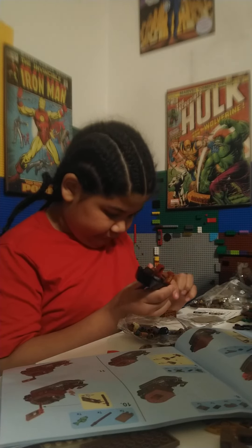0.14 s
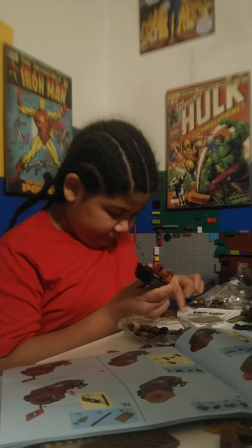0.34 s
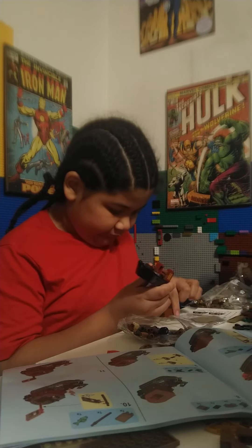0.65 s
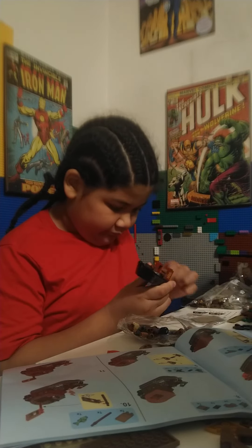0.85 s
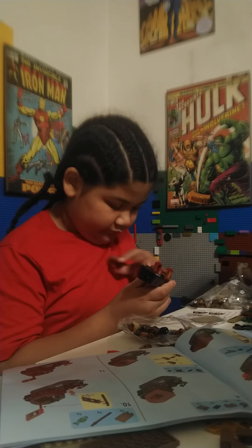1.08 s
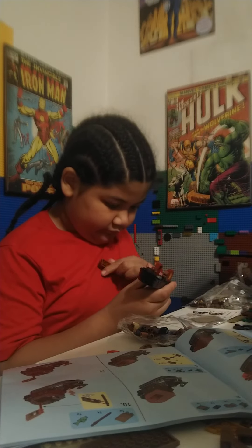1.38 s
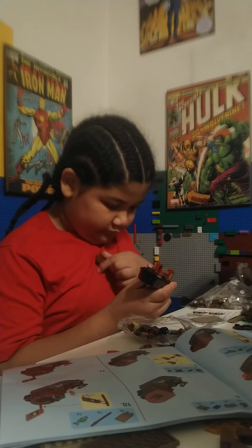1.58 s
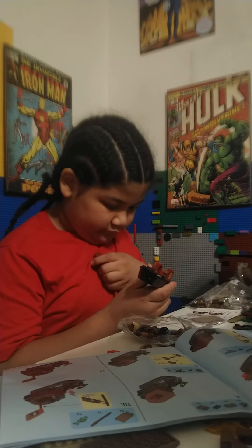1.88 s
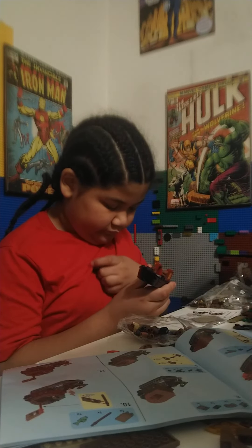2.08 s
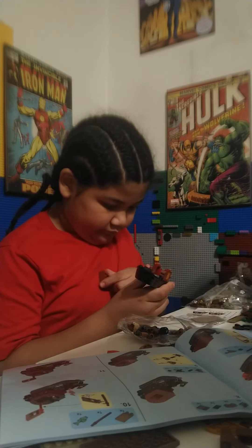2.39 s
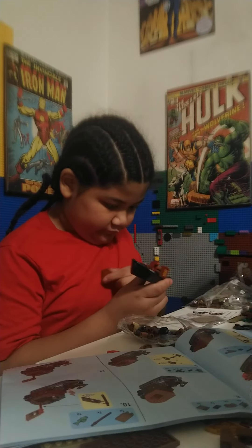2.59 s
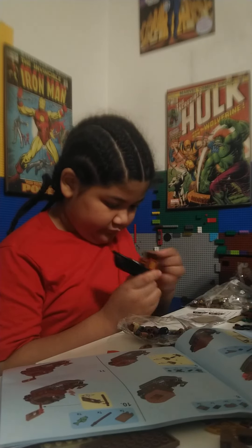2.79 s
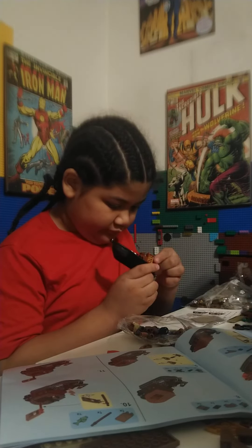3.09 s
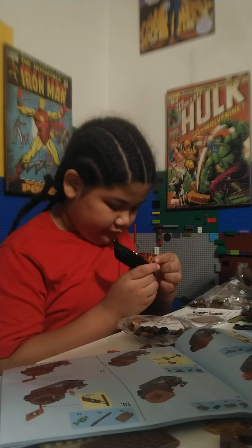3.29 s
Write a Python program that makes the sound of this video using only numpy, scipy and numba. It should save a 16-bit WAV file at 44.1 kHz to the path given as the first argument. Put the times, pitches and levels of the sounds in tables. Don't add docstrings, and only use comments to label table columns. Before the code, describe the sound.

Small plastic bricks clack and rattle on a table in a quick burst, click again more softly half a second later, then only muffled bumps and faint ticks in a small bedroom, close phone microphone.

```python
import sys
import numpy as np
from scipy import signal
from scipy.io import wavfile
from scipy.ndimage import uniform_filter1d
from numba import njit

SR = 44100
rng = np.random.default_rng(int(sys.argv[2]) if len(sys.argv) > 2 else 0)


def boost_factor(decibels):
    exponent = np.asarray(decibels, float) / 20
    return 10 ** exponent


def wav_record(signal):
    frames = np.transpose(np.atleast_2d(signal))
    bounded = np.clip(frames, -1, 1)
    quanta = np.round(bounded * 32767).astype(np.int16)
    wavfile.write(sys.argv[1], SR, quanta)


N = 152145


def level(x, db):
    return x * boost_factor(db) / np.sqrt(np.mean(x ** 2))


def peak(x):
    return x / np.abs(x).max()


@njit
def svf(x, hz, width):
    y, band, low = np.empty(len(x)), 0., 0.
    g, damping = np.tan(np.pi * hz / SR), width / hz
    for i in range(len(x)):
        v = (band + g * (x[i] - low)) / (1 + g * (g + damping))
        band, low = 2 * v - band, low + 2 * g * v
        y[i] = damping * v
    return y


def walk(rate):
    hold = int(SR / rate)
    steps = np.repeat(rng.standard_normal(N // hold + 1), hold)
    return 1.45 * uniform_filter1d(uniform_filter1d(steps, hold), hold)[:N]


def add(out, s, x):
    i = max(int(s * SR), 0)
    out[i:i + len(x)] += x[:N - i]


def rattle(t60, crack_db):
    size, hits_per_s, rattle_db, scatter_db = 8192, 3500, -15.5, 3.5
    chance, side, strength = rng.random((3, size))
    happens = chance < hits_per_s / SR
    hits = happens * np.sign(side - .5) * boost_factor(-scatter_db * np.log(strength + 1e-9))
    x = boost_factor(rattle_db) * hits * boost_factor(-60 * np.arange(size) / SR / max(t60, .005))
    x[0] += boost_factor(crack_db)
    return x


def ring(x, modes, widen):
    out = 0
    for k, (hz, width, db) in enumerate(modes):
        pitch_off, level_off = 1 + .01 * rng.standard_normal(2)
        gain = (-1) ** k * boost_factor(db + 55 * (level_off - 1)) / np.sqrt(width * widen)
        out = out + gain * svf(x, hz * pitch_off, width * widen)
    return out


def snap_cycle(cut_hz):
    turn = np.arange(128) / SR * 0.36 * cut_hz
    return peak(np.sin(2 * np.pi * turn) * np.exp(-(2 * (turn - 1)) ** 2))


def knocks():
    # t/s, peak level/dB, treble share/dB, rattle t60/s, contact cut-off f/Hz
    knock_list = [(.0, -43, -22.5, 0.069, 2045), (0.017, -22.5, -22, 0.066, 3910),
                  (.024, -34.5, -30.5, 0.24, 3450), (.074, -28, -31.5, 0.17, 2890),
                  (.088, -26.5, -21, 0.04, 3900), (0.104, -33, -21, 0.082, 2900),
                  (.145, -33, -30.5, 0.051, 2600), (.153, -36.5, -21.5, 0.11, 3700),
                  (0.443, -53.5, -46, 0.095, 2010), (.505, -59, -29.5, 0.24, 1780),
                  (.539, -49.5, -34, 0.29, 934), (0.5613, -36.5, -10, 0.11, 4700),
                  (0.574, -46.5, -15.5, 0.036, 3940), (0.589, -44.5, -6.5, 0.06, 2500),
                  (.598, -45, -14, 0.15, 2500), (0.61, -46.5, -24.5, 0.062, 3020)]
    # f/Hz, width/Hz, level/dB
    body_modes = [(512, 22, 0), (643, 54, -1.5), (1092, 32, 6.5), (1420, 65, 5.5), (1830, 61, -12),
                  (2050, 24, 1), (2620, 59, -5), (3120, 120, 2), (3460, 180, -5)]
    # f/Hz, width/Hz, level/dB
    stud_modes = [(3730, 960, -1), (4460, 770, -4), (5850, 720, 0.5), (7150, 340, 2)]
    knock_db, treble_gain_db, broad_db, table_db, snap_db = -4, 7, 8.5, -8.5, 3.5
    boom_lag_s = .005
    out = np.zeros(N)
    for s, db, treble_db, t60, cut_hz in knock_list:
        force = rattle(t60, crack_db=-6)
        studs = peak(ring(force, stud_modes, widen=0.96))
        soft = signal.butter(3, 0.94 * cut_hz, fs=SR)
        dull = peak(signal.lfilter(*soft, force))
        body = peak(ring(dull, body_modes, widen=2.1))
        body = body + boost_factor(broad_db) * svf(dull, 2000.0, 1700.0)
        boom = svf(dull, 125., 60.0) + 3 * svf(dull, 230., 37.0) + .6 * svf(dull, 354.0, 61.0)
        add(out, s, boost_factor(db + knock_db) * (body + boost_factor(treble_db + treble_gain_db) * studs))
        dulling_db = 0.54 * max(treble_db + 24.5, 0)
        add(out, s, boost_factor(db + snap_db - dulling_db) * snap_cycle(cut_hz))
        add(out, s + boom_lag_s, boost_factor(db + knock_db) * boost_factor(table_db) * 10 * boom)
    return out


def pings():
    # t/s at the crest, level/dB, f/Hz
    rebounds = [(.0182, -38, 1975), (.0264, -42, 2790), (0.0335, -39.5, 2860), (0.0344, -47, 1290),
                (.033, -47.5, 3590), (0.049, -41, 1500), (0.048, -43, 2790), (0.055, -45.5, 2670),
                (0.0193, -52.5, 6800), (.076, -61.5, 4950), (.0748, -43.5, 1808), (.078, -43, 2300),
                (.089, -32, 1176), (.089, -52, 7000), (.1, -56.5, 7020), (0.114, -56.5, 7150),
                (.123, -59.5, 7150), (.096, -39, 1216), (.1013, -50, 2670), (.1053, -51.5, 2680),
                (.1147, -46.5, 2710), (0.1461, -46.5, 1205), (0.154, -37.5, 1200), (0.1571, -48, 2650),
                (0.1795, -56, 2550), (.442, -64, 1700), (0.5058, -59.5, 1180), (0.5569, -56, 1130),
                (0.5634, -39.5, 1114), (.564, -43, 7150), (0.5646, -50, 2990), (.572, -46, 2080),
                (.5724, -51, 3250), (0.5733, -49, 7150), (0.5786, -48, 3000), (0.5807, -50.5, 1145),
                (0.588, -56.5, 7150), (0.5927, -50, 1162), (.6, -54, 717), (0.5935, -57, 7150),
                (0.6006, -45.5, 1100), (.6009, -49.5, 2600), (0.6106, -54, 2590)]
    # t/s at the crest, level/dB, f/Hz
    faint_rebounds = [(1.9261, -72, 2282), (1.9349, -71, 2350), (1.9388, -72, 3200), (1.9445, -59, 2255),
                      (1.9473, -71, 5060), (1.9496, -77, 7470), (1.952, -63, 2253), (1.9623, -68.5, 2290),
                      (2.075, -76, 3340), (2.0895, -76, 2756), (2.3711, -82, 5060), (3.118, -76, 6030),
                      (3.124, -70, 3030), (2.015, -78, 2230), (3.1189, -65.5, 1024), (3.1198, -67.5, 3100),
                      (3.1301, -75, 1507), (3.1307, -71.5, 2885), (3.1478, -81, 5100), (3.1486, -76, 3830),
                      (3.1513, -69, 1624), (3.1567, -70, 2320)]
    out, t = np.zeros(N), np.arange(1024) / SR
    for rows, rise_s in ((rebounds, .0014), (faint_rebounds, .002)):
        for s, db, hz in rows:
            tone = np.sin(2 * np.pi * (hz * t + rng.random()))
            swell = t / rise_s * np.exp(1 - t / rise_s)
            add(out, s - 1.5 * rise_s, boost_factor(db + 1) * swell * tone)
    return out


def ticks():
    # t/s, peak level/dB, f/Hz, width/Hz, rattle t60/s
    tick_list = [(0.599, -63, 5850, 250, 0.069), (0.619, -70.5, 7150, 201, 0.36),
                 (0.636, -62, 2660, 90.6, 0.035), (.68, -60.5, 1420, 201, 0.23),
                 (1.09, -69.5, 1140, 149, 0.084), (1.48, -77.5, 7130, 200, 0.49),
                 (1.9244, -64.5, 2250, 1510, .25), (1.927, -65.5, 5030, 2490, 0.23),
                 (1.93, -65.5, 7250, 500, 0.1), (2.0607, -63, 5060, 3500, 0.01),
                 (2.37, -69.5, 4800, 2500, 0.03), (3.115, -62.5, 1200, 900, 0.2),
                 (3.115, -64, 6400, 1990, .12), (3.122, -68, 3100, 1500, 0.1),
                 (3.146, -71, 5900, 2500, 0.08), (3.148, -64.5, 2010, 1200, 0.25),
                 (3.152, -70, 3700, 1490, .08)]
    out = np.zeros(N)
    for s, db, hz, width, t60 in tick_list:
        force = rattle(t60, crack_db=-12)
        note = svf(svf(force, 1. * hz, 1. * width), 1. * hz, 2. * width)
        broad = svf(force, 1. * hz, 1.1 * hz)
        add(out, s, boost_factor(db) * (peak(note) + boost_factor(-1.5) * peak(broad)))
    return out


def bump_wave(t, hz, sharpness):
    swell = np.exp(-.5 * (t * sharpness * hz / 0.53) ** 2)
    pitch = hz if sharpness == 1 else 1.15 * hz
    return swell * np.cos(2 * np.pi * (pitch * t + rng.random()))


def bumps():
    # t/s at the crest, crest level/dB, f/Hz
    bump_list = [(0.698, -49.5, 128), (0.741, -46, 113), (0.755, -63, 130), (0.778, -50.5, 86),
                 (0.849, -52, 87.5), (0.959, -51, 85.75), (0.98, -43.5, 86), (0.997, -48.5, 159),
                 (1.007, -35, 107), (1.028, -41, 139), (1.053, -39, 124), (1.07, -38.5, 121.8),
                 (1.086, -37, 131), (1.105, -44.5, 106), (1.12, -42, 133), (1.151, -44, 114), (1.195, -51, 97),
                 (1.224, -36, 111), (1.238, -52, 132.3), (1.31, -37.5, 111), (1.327, -54, 130),
                 (1.35, -42, 105), (1.369, -41.5, 101), (1.381, -50, 148), (1.396, -45.5, 94),
                 (1.412, -68, 150), (1.421, -38, 107), (1.457, -47.5, 131), (1.485, -45, 92),
                 (1.502, -33.5, 108),
                 (1.505, -45.5, 182), (1.515, -47, 75), (1.529, -36.5, 146), (1.542, -39, 143.5),
            (1.555, -34.5, 98), (1.559, -59, 160), (1.669, -46.5, 135), (1.68, -37.5, 130),
            (1.699, -39.5, 94), (1.722, -48, 141), (1.751, -41, 91), (1.803, -45.5, 105), (1.95, -42, 137),
            (1.965, -47, 100), (2.001, -48, 105), (2.087, -41, 129), (2.098, -44, 153), (2.099, -33, 118),
            (2.11, -49, 143), (2.268, -43, 90.5), (2.44, -41, 89), (2.616, -49.5, 111),
            (2.714, -46.5, 87.6), (2.925, -47.5, 93.5), (2.951, -51, 99), (2.989, -48.5, 153),
            (3.19, -39.5, 101.4), (3.307, -49.5, 121),
                 (2.493, -53, 94.3), (2.64, -54.5, 150), (2.76, -64, 109), (2.8, -64, 100),
              (2.849, -57, 110.3), (3.034, -50.5, 88), (3.271, -60.5, 70), (3.421, -64, 90),
              (.03, -48, 130), (.11, -43.5, 110), (0.166, -51, 140), (0.599, -49, 111), (2.099, -50, 195),
              (1.31, -56, 197)]
    half = 2048
    out, t = np.zeros(N), np.arange(-half, half) / SR
    for s, db, hz in bump_list:
        shape = bump_wave(t, hz, 1) + boost_factor(-15) * bump_wave(t, hz, 2.53)
        add(out, s - half / SR, boost_factor(db + 1.5) * shape)
    return out


def engine(t):
    # t/s, firing f/Hz, level/dB
    run = [(0, 74.95, -57), (.3, 76.13, -62.5), (.6, 79.9, -57), (.9, 82.05, -60), (1.3, 83.35, -58),
           (1.9, 83.87, -62.5), (2.3, 84.4, -70), (2.7, 83.7, -72), (3.45, 79.7, -80.5)]
    # multiple of the firing rate, level/dB
    orders = [(1, 1.8), (2, 1.47), (4.12, -17)]
    time_s, firing_hz, run_db = np.transpose(run)
    hz = np.interp(t, time_s, firing_hz) * (1 + 0.0031 * walk(8.19))
    phase = 2 * np.pi * np.cumsum(hz) / SR
    out = 0
    for multiple, db in orders:
        wavering_db = db + 1.4 * walk(6.5)
        if multiple > 2:
            wavering_db = wavering_db - 130 * np.clip(t - 1.13, 0, .5)
        out = out + boost_factor(wavering_db) * np.sin(multiple * phase)
    return out * boost_factor(np.interp(t, time_s, run_db))


def hiss(t):
    # f/Hz, level per Hz/dB
    colour = [(24, -36), (40, -14.5), (104, -2.5), (165, -13.5), (392, -29.5), (585, -30), (1450, -33),
              (7160, -42.5), (8000, -39), (10400, -81), (17600, -120)]
    # t/s, level/dB
    swell_curve = [(0, 8), (.3, 7.5), (.7, 6), (1.1, 2.5), (1.6, 4.5), (2.2, 1.5), (3.45, -0.9)]
    # f/Hz, rms level/dB
    fan = [(581, -88), (1090, -91.5), (1464, -92)]
    colour_hz, colour_db = np.transpose(colour)
    swell_db = np.interp(t, *np.transpose(swell_curve))
    buffet = walk(30.12)
    out = 0
    for hz in 45 * 2 ** np.arange(0, 7.6, 1 / 3):
        db = np.interp(np.log(hz), np.log(colour_hz), colour_db)
        db = db + 1.4 * min(1000 / hz, 1) * walk(11)
        if hz < 200:
            db = db + 2.7 * buffet
        swell_share = min(1200.0 / hz, hz / 246, 1)
        band = svf(svf(rng.standard_normal(N), hz, hz / 3), hz, hz / 2)
        out = out + boost_factor(db + swell_db * swell_share) * band
    out = out * boost_factor(-77) / np.std(np.diff(out[N // 2:]) * 3)
    for hz, db in fan:
        out = out + level(svf(rng.standard_normal(N), 1. * hz, 40.0), db + 4.5)
    return out


def bedroom(near):
    t = np.arange(SR // 2) / SR
    tail = rng.standard_normal(SR // 2) * boost_factor(-60 * t / 0.23) * (t > .004)
    return signal.fftconvolve(near, tail / np.sqrt(np.sum(tail ** 2)))[:N] * boost_factor(-10.5)


def scene():
    t = np.arange(N) / SR
    near = knocks() + ticks() + pings()
    mix = near + bedroom(near) + bumps() + engine(t) + hiss(t)
    return np.tile(mix, (2, 1))


def band_limit(x):
    return signal.sosfilt(signal.butter(12, 8290, fs=SR, output="sos"), x)


def record(dry):
    x = signal.sosfilt(signal.butter(2, 58, "high", fs=SR, output="sos"), dry)
    x = signal.sosfilt(signal.butter(16, 7640, fs=SR, output="sos"), x)
    noise = level(svf(rng.standard_normal(N), 8200.0, 4000.), -104)
    mix = x + noise * np.array([[1], [-1]])
    return band_limit(mix)


dry = scene()
out = record(dry)
wav_record(out)
```